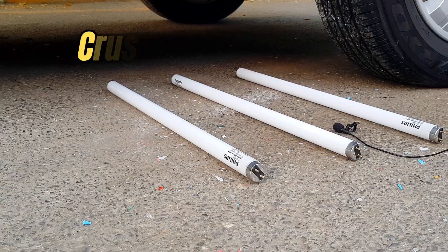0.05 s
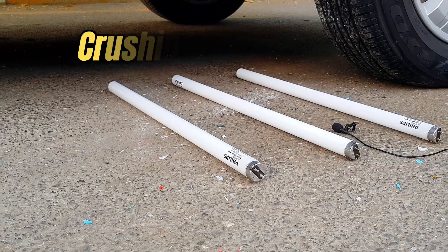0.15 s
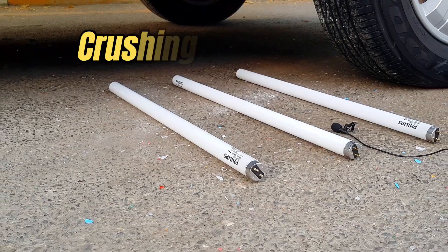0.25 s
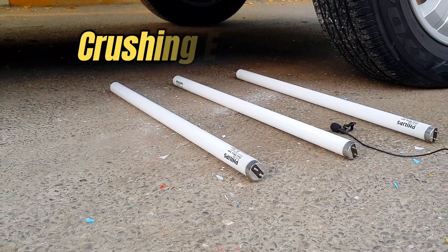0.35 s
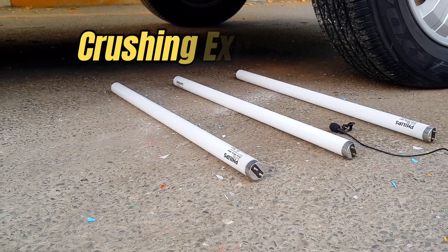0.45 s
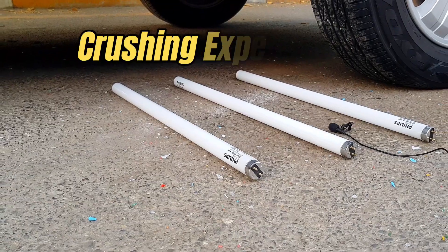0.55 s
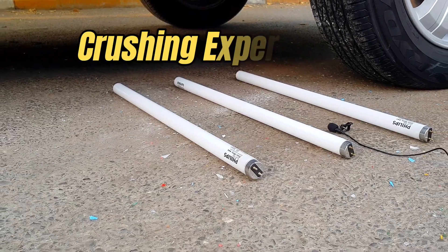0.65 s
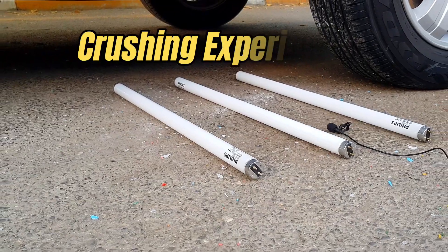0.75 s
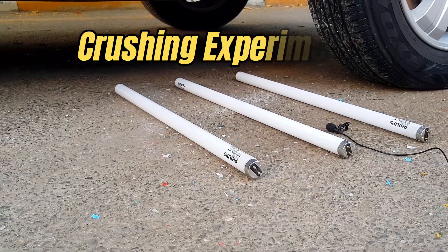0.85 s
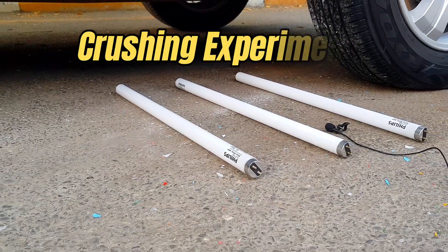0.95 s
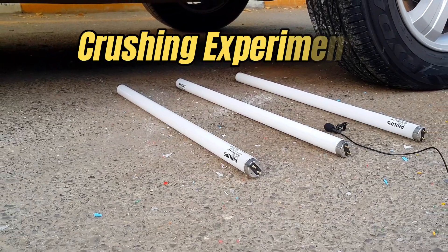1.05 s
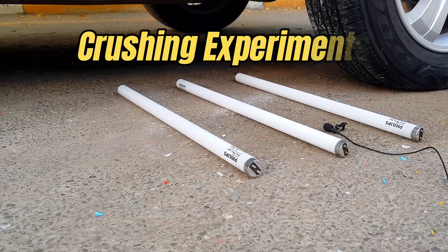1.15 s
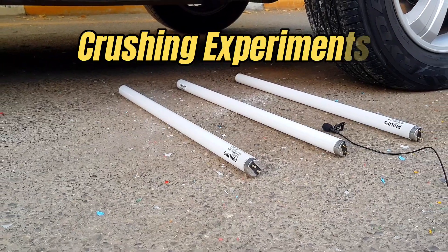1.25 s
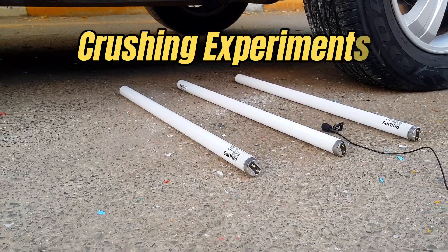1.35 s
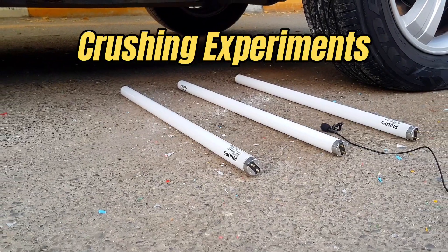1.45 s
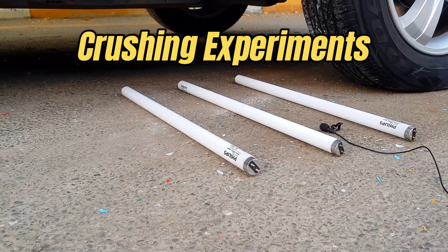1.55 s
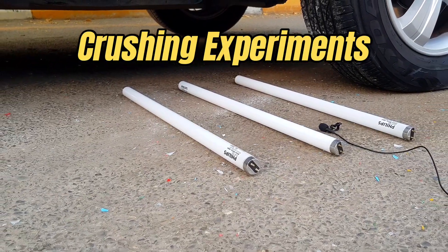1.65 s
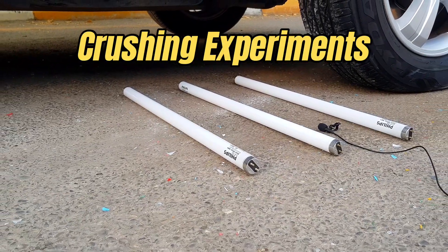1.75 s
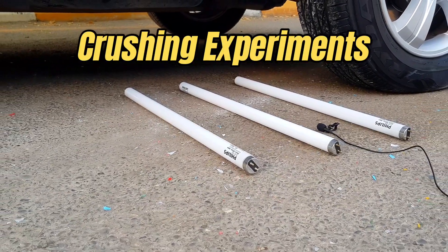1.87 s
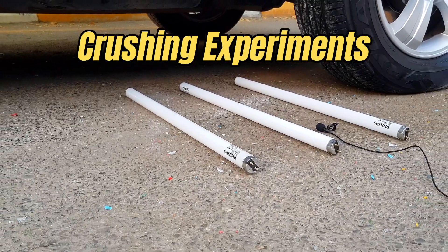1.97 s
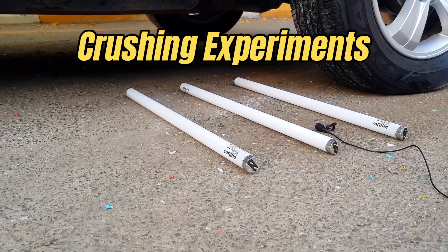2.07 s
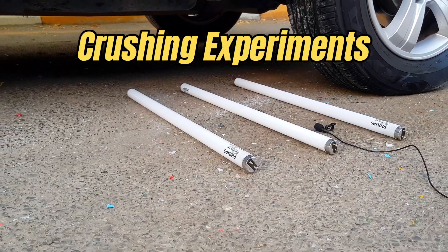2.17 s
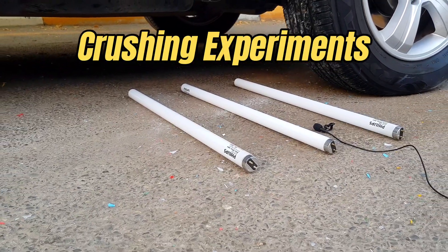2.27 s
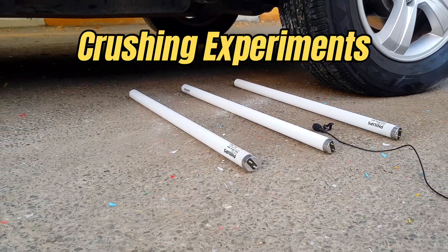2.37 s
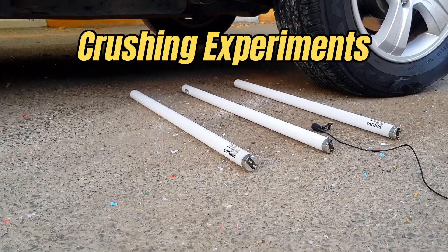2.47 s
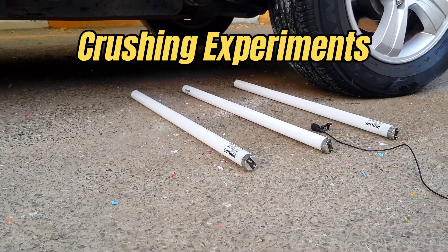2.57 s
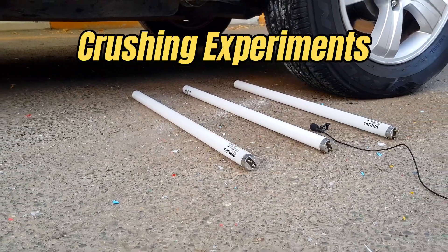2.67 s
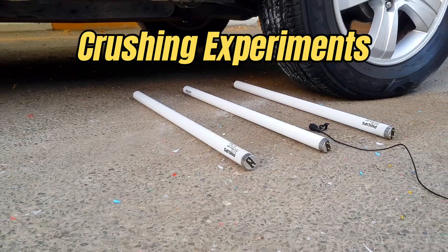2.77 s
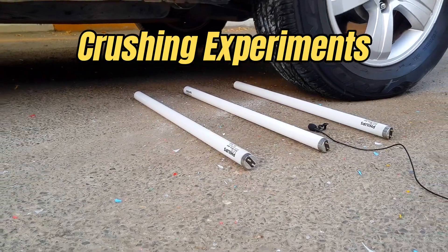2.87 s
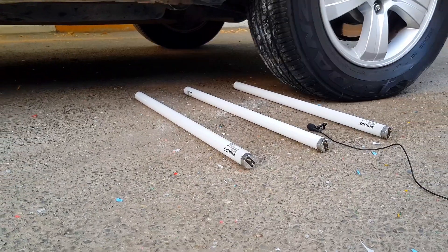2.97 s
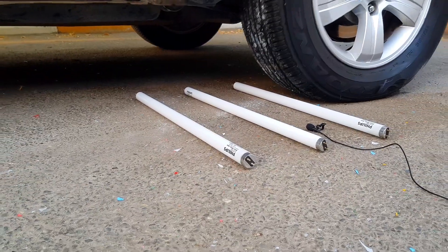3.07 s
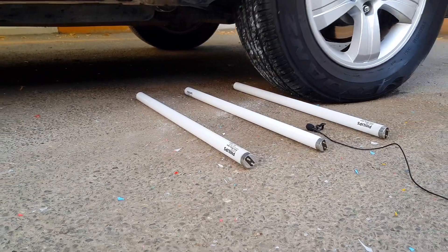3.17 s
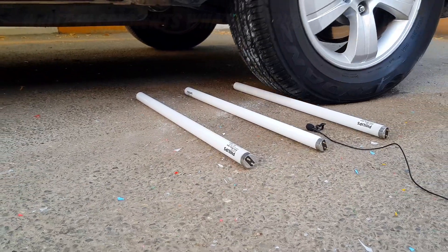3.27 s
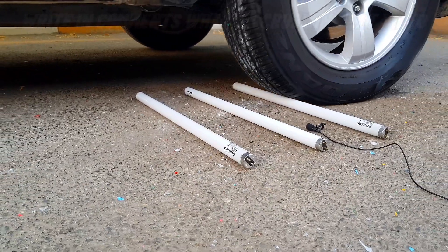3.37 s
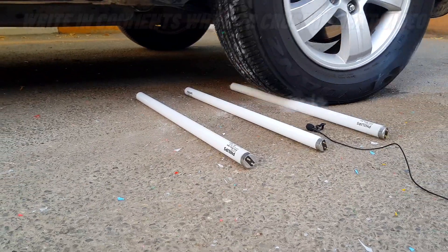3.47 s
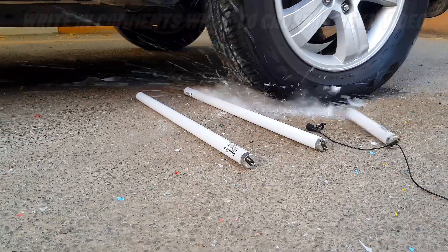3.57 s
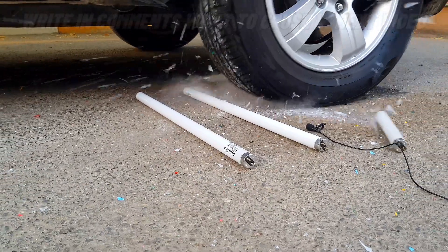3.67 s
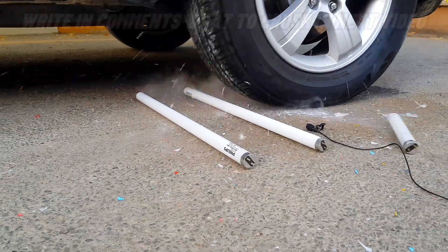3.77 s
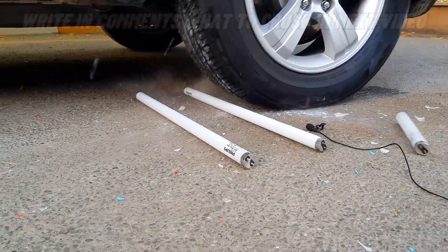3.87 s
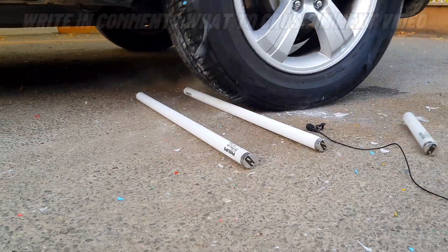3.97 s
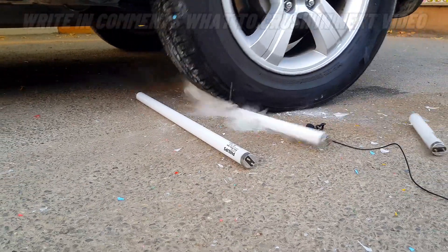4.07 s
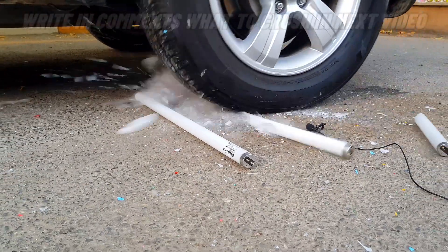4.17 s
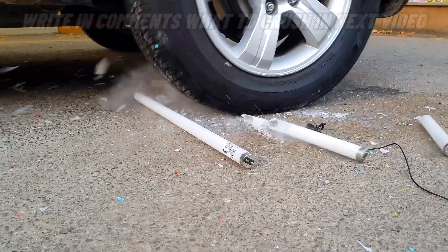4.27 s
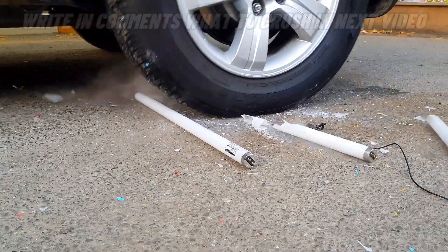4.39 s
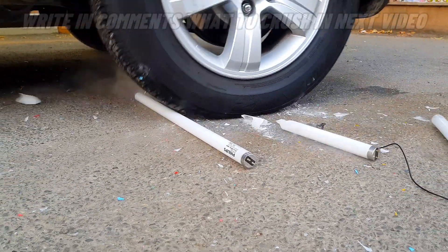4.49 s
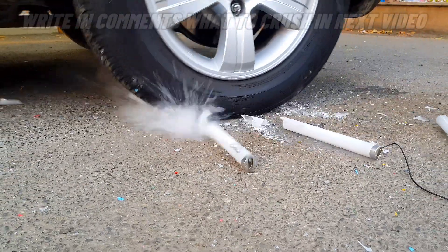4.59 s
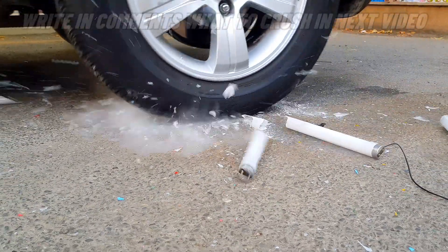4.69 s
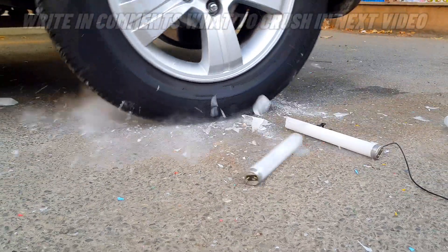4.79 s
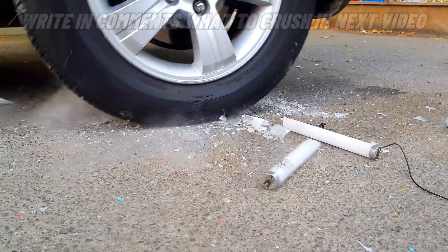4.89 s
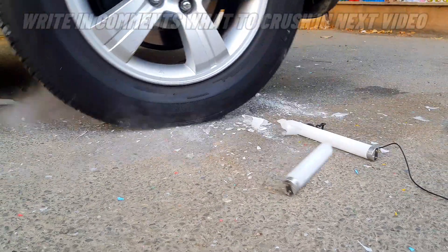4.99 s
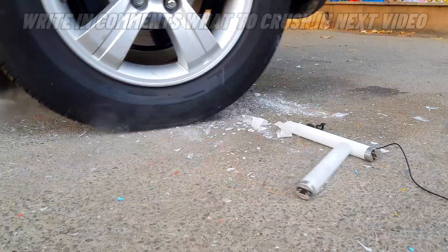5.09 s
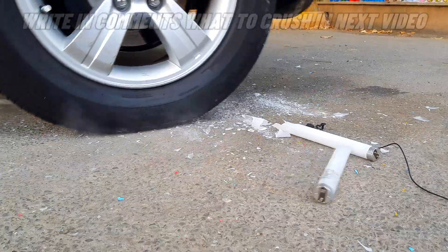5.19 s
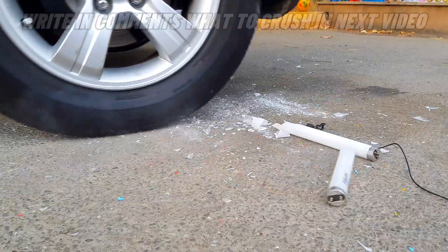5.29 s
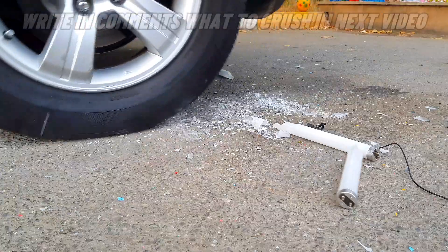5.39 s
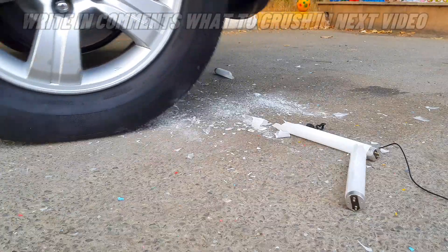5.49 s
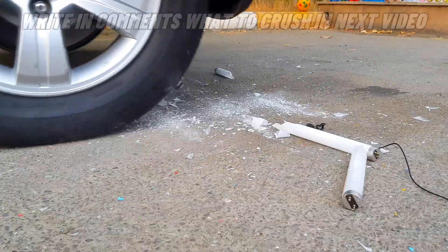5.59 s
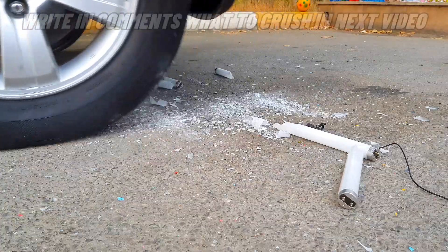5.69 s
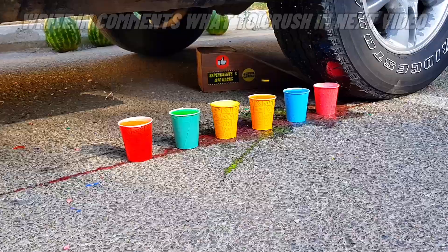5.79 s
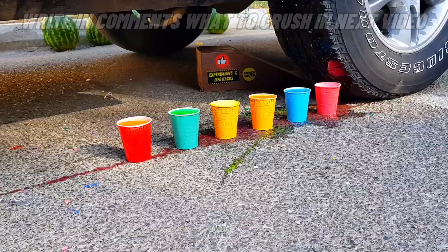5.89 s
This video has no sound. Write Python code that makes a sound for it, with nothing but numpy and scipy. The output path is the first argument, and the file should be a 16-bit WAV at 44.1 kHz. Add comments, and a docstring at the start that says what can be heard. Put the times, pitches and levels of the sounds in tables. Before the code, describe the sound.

Low pulsing car idle, a few gritty ticks, then three loud glass tube implosions on asphalt with bright clinking debris that fades away.

```python
"""Glass tubes crushed under an idling car

A car idles and creeps over three glass lamp tubes on asphalt, close to a small microphone. Idle: one filtered
pulse per firing, noise clatter and fuzzy whines; its level drops sharply as the glass starts. Tubes: cracks,
hollow pops and cavity booms of shaped noise, then showers of short ringing shards. Broken stubs bounce as noise
cracks with decaying sines; a soft noise wash cuts in abruptly near the end."""
import sys
import numpy as np
from scipy import signal
from scipy.fft import rfft, irfft
from scipy.io import wavfile
from scipy.ndimage import uniform_filter1d

SR = 44100
rng = np.random.default_rng(int(sys.argv[2]) if len(sys.argv) > 2 else 0)


def dump_mix(stems):
    """Bounce the given channels to the path in sys.argv[1] as a 16-bit WAV at rate SR."""
    frames = np.atleast_2d(stems).T  # one column per channel
    limited = np.clip(frames, -1, 1)  # hard clip at full scale
    pcm = np.round(limited * 32767).astype(np.int16)
    wavfile.write(sys.argv[1], SR, pcm)


N = 261845

# implosions: t/s, pop/dB, cavity f/Hz, cavity/dB, shattering/dB, shattering t60/s,
# falling shards/dB, their fade/(dB/s)
IMPLOSIONS = [(3.535, -3.5, 730, -10.5, -13, 0.37, -26.5, 25),
              (4.118, -6, 557, -10.5, -10.5, 0.28, -23.5, 61), (4.646, -2, 984, -7, -30, 1, -35.5, 17)]
# spectrum of breaking glass: f/Hz, relative density/dB
GLASS_SPECTRUM = [(710, -23), (1200, 20), (1610, 4.5), (2340, -4.5), (3290, -5.5), (5890, -7), (6150, 0),
                  (6860, 3.5), (13100, 4), (16000, -10), (16500, -41)]
# ringing cracks and bounces: t/s, level/dB, bass re middle/dB, treble re middle/dB,
# own ring f/Hz, own ring/dB, stub ring/dB
BOUNCES = [(3.425, -9.5, 9, 17, 7340, -9, -4), (3.428, -13, -24, -11, 8870, 4.5, -2),
           (3.43, -23, -11, -7, 4180, 4, -20), (3.44, -13.5, -4.5, -20, 2336, -1.5, -25),
           (3.442, -19.5, 0, -9, 1142, 0.5, -18), (3.463, -18, 11, 7, 10400, -17, -19),
           (3.469, -21.5, 16, 0, 1297, -5, -18), (3.486, -32.5, 12, -13, 2330, -3, 1),
           (3.551, -7, 25, 45, 1147, -12, -26), (3.554, -21, -4, 17, 4980, 1, -9),
           (3.567, -18, -1, 23, 5720, -0.5, -9), (3.592, -29, -5, 12, 3900, 1, -12),
           (3.589, -11, -39, 15, 6940, -20, 6.5), (3.61, -28.5, 3, -1, 2200, 0, -3),
           (3.614, -14.5, 9, 20, 12500, -0.5, 6.5), (3.695, -30.5, 22, 14, 3010, 0, -9),
           (3.73, -21.5, 14, 28, 12600, -2, -3), (3.765, -19.5, 1, 5, 6600, -18, -5),
           (3.824, -22, -2, 3, 3220, -7, -9), (3.863, -30, 8, -13, 3250, -1, -4),
           (4.095, -16.5, 0, 15, 9600, -29, -18), (4.209, -13, 2.5, 8, 2190, -9.5, -11),
           (4.232, -5.5, -2, 6, 8040, -22, -10), (4.242, -8.5, -8, 0.5, 8340, 2.5, -16),
           (4.316, -12.5, 0, 4.5, 3830, -4.5, -6), (4.376, -14.5, -2.5, 1, 1700, -32, -3),
           (4.416, -17, -4.5, -8, 3190, 1.5, -2.5), (4.449, -21, -3.5, -3, 3780, 2, -2.5),
           (4.541, -19, 9, 13, 886, -18, -5), (4.607, -16, 4, 8.5, 9000, -21, -23),
           (4.704, -7.5, 14, 40, 8380, -5.5, -2), (4.723, -11, -16.5, -7, 9400, 2, -3),
           (4.753, -18, 40, 42, 4620, -25, 1), (4.82, -25.5, 12, -22, 3070, -7, -3.5),
           (4.895, -40.5, -6, 27, 10000, 17, -10), (4.921, -23.5, 6.5, -2, 4820, -5, -3.5),
           (5.038, -37, 13, 14, 9850, -15, 10.5), (5.061, -14.5, -11, 4.5, 9280, -2, -3.5),
           (5.055, -27, -11, 9, 13700, 5, -12), (5.072, -23, -1, 1, 11660, 2, -0.5),
           (5.081, -31, -9, -10, 3800, -9, 3.5), (5.095, -17.5, -13, 12, 9020, -1, -20),
           (5.172, -18, 10.5, 9, 3900, -9, -20), (5.191, -27, -8, -1, 5670, -7, -1.5),
           (5.292, -35.5, 12, 3, 6200, -3, 4)]
# closing wash: t/s, level/dB
WASH_LEVEL = [(5.74, -74), (5.78, -40), (5.85, -38), (5.94, -40)]


def amp(db):
    """Amplitude factor of a level in dB."""
    return 10 ** (np.asarray(db) / 20)


def evened(x):
    """Scale to rms 1."""
    return x / np.sqrt(np.mean(x ** 2) + 1e-20)


def read(points, hz):
    """Value of a spectrum table on a log-frequency axis."""
    f, value = np.transpose(points)
    return np.interp(np.log(hz + 1), np.log(f + 1), value)


def curve(rows):
    """Columns of a time table at every sample."""
    s, *columns = np.transpose(rows)
    return [np.interp(np.arange(N) / SR, s, c) for c in columns]


def add(mix, s, sound):
    """Add a sound into the mix at s seconds, cut at the end."""
    part = mix[round(s * SR):][:len(sound)]
    part += sound[:len(part)]


def coloured(points, size):
    """Noise of rms 1 with the given spectrum."""
    gain = amp(read(points, np.fft.rfftfreq(size, 1 / SR)))
    return evened(irfft(rfft(rng.standard_normal(size)) * gain, size))


def causal(points, size=16384):
    """Minimum-phase impulse response of a spectrum, floored at -100 dB."""
    hz = abs(np.fft.fftfreq(size, 1 / SR))
    log_gain = np.log(amp(np.maximum(read(points, hz), -100)))
    return np.fft.ifft(np.exp(np.conj(signal.hilbert(log_gain)))).real[:size // 2]


def fuzzy(hz, width_hz):
    """Narrow noise of rms 1 on a fixed or drifting centre: two equal poles, shifted up."""
    r = np.exp(-np.pi * width_hz / SR)
    noise = rng.standard_normal(N) + 1j * rng.standard_normal(N)
    slow = signal.lfilter([1], np.poly([r, r]), noise)
    carrier = np.exp(2j * np.pi * np.cumsum(hz * np.ones(N)) / SR)
    return evened((slow * carrier).real)


def rings(modes, t, spread_db):
    """Decaying sines, each struck up to spread_db weaker and at a random phase."""
    hz, db, t60_s = np.transpose(modes)[:, :, None]
    luck = rng.random((len(modes), 2, 1))
    envelope = amp(db - spread_db * luck[:, 0] - 60 * t / t60_s)
    return (envelope * np.sin(2 * np.pi * (hz * t + luck[:, 1]))).sum(0)


def wash():
    """Soft broad noise that cuts in abruptly near the end."""
    # f/Hz, relative density/dB
    wash_spectrum = [(15, -46), (25, -8), (69, -3), (213, -15.5), (257, -15.5), (501, -20), (588, -25),
                     (673, -20), (749, -25), (1460, -27), (1580, -34), (2500, -24.5), (15000, -50)]
    return amp(curve(WASH_LEVEL)[0]) * coloured(wash_spectrum, N)


def hum():
    """Low narrow-band hum under the glass."""
    # t/s, level/dB
    hum_level = [(3.55, -84), (3.65, -55.5), (4.6, -56.5), (5.1, -47), (5.5, -81), (5.75, -88)]
    return amp(curve(hum_level)[0]) * fuzzy(218.5, 10.0)


def whistle():
    """Fuzzy high whistle of the engine bay: drifting narrow noise that swells and fades."""
    # t/s, centre f/Hz, level/dB
    whistle_track = [(1.7, 8600, -59), (2.15, 8550, -55), (2.4, 8500, -44.5), (2.7, 8300, -55),
                     (2.9, 8200, -52), (3.05, 8300, -63), (3.35, 8300, -42)]
    hz, db = curve(whistle_track)
    t = np.arange(N) / SR
    start_s, end_s = whistle_track[0][0], whistle_track[-1][0] + 0.13
    gate = np.clip(np.minimum(t - start_s, end_s - t) / 0.4, 0, 1)
    return gate * amp(db) * fuzzy(hz, 360.0)


def engine():
    """One puff a firing: the pipe booms, a sharp drop ends its first crest, clatter pulses in step."""
    # engine speed: t/s, firing rate/Hz
    firing_rate = [(0, 23.28), (1.3, 23.31), (1.6, 23.39), (3.3, 23.37), (4.6, 23.2), (4.9, 23.5),
                   (5.75, 23.5)]
    # idle: t/s, puff level/dB
    idle_level = [(0, -27.5), (1.6, -27), (3.4, -28), (3.7, -47.5), (4.9, -43.5), (5.74, -47), (5.8, -54)]
    # exhaust spectrum: multiple of 23.4 Hz, relative level/dB
    exhaust_orders = [(1, -103), (2, -0.5), (3, 2), (4, 3.5), (5, -17.5), (6, -12.5), (7, -7.5), (8, -9),
                      (9, -14.5), (10, -19.5), (11, -14.5), (12, -16), (13, -15.5), (14, -16), (15, -16.5),
                      (16, -31.5)]
    # engine bay noise: f/Hz, relative density/dB
    clatter_spectrum = [(59, -9.5), (100, -3), (124, -15.5), (174, -13), (335, -17.5), (415, -18.5),
                        (1030, -21), (1360, -28.5), (1870, -28.5), (3860, -33), (4290, -36), (6700, -36),
                        (8640, -29.5), (13500, -48.5), (16000, -55)]
    # fuzzy engine bay tones: f/Hz, width/Hz, level re puffs/dB
    fuzzy_tones = [(1508, 21, -34), (4200, 40., -35.5), (7400, 340, -34.5), (8800, 290, -32),
                   (11380, 950, -30), (13270, 790, -30)]
    # thin engine bay tone: f/Hz, level re puffs/dB
    thin_tone = (4398, -32)

    rate_hz = curve(firing_rate)[0]
    lead_in = np.full(SR // 10, rate_hz[0])  # already running at the start
    turns = np.cumsum(np.r_[lead_in, rate_hz]) / SR + .13
    fired = np.diff(np.floor(turns), prepend=0)
    fired = fired * amp(.9 * rng.standard_normal(len(turns)))

    orders = [(k * 23.4, db) for k, db in exhaust_orders]
    boom = causal([(10, -63)] + orders[:5] + [(170, -44.5), (400, -96.0)])
    edge = causal([(60, -65.0), (110, -10.5)] + orders[5:] + [(600, -25.5), (1500, -91.5)])
    late = round(0.01215 * SR)
    pulse = boom - np.r_[np.zeros(late), edge[:-late]]
    puffs = evened(signal.oaconvolve(fired, pulse)[len(turns) - N:len(turns)])

    clatter = coloured(clatter_spectrum, N) * (1 + 0.048 * np.cos(2 * np.pi * turns[-N:] - 1.5))
    whines = sum(amp(db) * fuzzy(hz, width_hz) for hz, width_hz, db in fuzzy_tones)
    thin_hz, thin_db = thin_tone
    phase_wander = 4.4 * fuzzy(2., 2.7)
    whines += amp(thin_db) * np.sin(2 * np.pi * thin_hz * np.arange(N) / SR + phase_wander)
    rumble = amp(-18) * fuzzy(70., 25.)
    return amp(curve(idle_level)[0]) * (puffs + amp(-7.5) * clatter + rumble + whines)


def thud(db, hz, t60_s):
    """Soft low push of tyre and tube on the ground: a decaying sine."""
    t = np.arange(SR // 3) / SR
    return amp(db - 60 * t / t60_s) * np.sin(2 * np.pi * hz * t)


def tint(low_db, high_db):
    """Spectrum of one crack, from its bass and treble against the middle."""
    return [(250, low_db - 8.0), (1200, low_db), (4200, 0), (10000, high_db), (16000, high_db - 15.0)]


def crack(level_db, colour, t60_s, t):
    """A spike, then a short crackle, both of one coloured noise."""
    envelope = amp(-60 * t / t60_s) + 0.34 * np.exp(-t / 0.00018)
    return amp(level_db) * coloured(colour, len(t)) * envelope


def tick(level_db, low_db, high_db):
    """Grit or a bare splinter: the crack alone."""
    return crack(level_db, tint(low_db, high_db), .006, np.arange(SR // 10) / SR)


def clink(s, level_db, low_db, high_db, hz, own_db, stub_db):
    """A crack, the shard's own ring, and the ring of the stub that bounces just then."""
    # ringing stubs: f/Hz, level/dB, t60/s
    first_stub = [(1150, -6, .06), (2180, -10, .12), (2340, -3, .14), (3060, -8, .08), (3800, -9, .07),
                  (4250, -5, .05), (4900, -10, .12), (5800, -8, .08), (6500, -11, .3), (7080, -4, .1),
                  (8900, -5, .05), (9330, -3, .1), (10920, -6, .08), (12600, -7, .05)]
    second_stub = [(870, -13, .4), (1595, 0, .2), (1869, -6, .3), (2390, -5, .25), (2955, -7, .15),
                   (3197, -5, .1), (3800, -4, .1), (4622, -4, .25), (5281, -9, .15), (6293, -7, .15),
                   (8300, -3, .09), (8880, -8, .1), (9400, -1, .11), (10530, -8, .08), (11960, -8, .08)]
    third_stub = [(1880, -9, .2), (2412, -8, .1), (3860, -9, .11), (4791, -6, .22), (5642, -9, .22),
                  (6584, -7, .16), (7230, -2, .3), (9426, -2, .16), (9860, -4, .15), (11360, -2, .13),
                  (13400, -6, .1), (13880, -5, .08)]
    # start of the second and third stub's bounces: t/s
    takeover_s = (4.11, 4.85)

    t, colour = np.arange(SR // 3) / SR, tint(low_db, high_db)
    stub = np.array((first_stub, second_stub, third_stub)[np.searchsorted(takeover_s, s)], float)
    # the crack's colour also tilts the stub modes
    stub[:, 1] += stub_db + 1.39 * (read(colour, stub[:, 0]) - max(db for _, db in colour))
    own_t60_s = .085 * (5000 / hz) ** .15  # lower shards ring longer
    ring = rings([(hz, own_db, own_t60_s)], t, 0) + rings(stub, t, 3.7)
    return crack(level_db, colour, .02, t) + amp(level_db) * ring * (1 - np.exp(-t / 0.00069))


def shards(rate_hz, spread_db, tick_db, longest_t60_s, count=70):
    """Many small shards, each kind a tick with three short rings; a few land hard. Levelled locally."""
    landed = rng.random(len(rate_hz)) < rate_hz / SR
    size = amp(spread_db * np.minimum(rng.exponential(1, len(rate_hz)), 4)) * landed
    kind = rng.integers(0, count, len(rate_hz))
    t, out = np.arange(3000) / SR, np.zeros(len(rate_hz))
    for k in range(count):
        hz = np.exp(rng.uniform(np.log(2100), np.log(15500), 3))
        mode_db = read(GLASS_SPECTRUM, hz) + 0.6 * np.log2(hz / 4000)
        modes = np.transpose([hz, mode_db, longest_t60_s * rng.uniform(0.1, 1, 3)])
        contact = coloured([(hz[0] / 17.0, -18), (hz[0], 0), (hz[0] * 2.0, -15)], len(t))
        contact = amp(tick_db - 60 * t / 0.0011) * contact
        out += signal.oaconvolve(size * (kind == k), contact + rings(modes, t, 9.))[:len(rate_hz)]
    return out / np.sqrt(uniform_filter1d(out ** 2, 6001) + 1e-9)


def shower():
    """Shards land after a flight, then ever fewer and fainter, over the fine hiss of glass dust."""
    t, power, rate_hz = np.arange(N) / SR, np.zeros(N), np.zeros(N)
    # t/s, level/dB, fade/(dB/s), flight/s, landings/(1/s)
    throws = [(row[0], *row[-2:], .12, 600) for row in IMPLOSIONS]
    # every bounce sheds a few splinters of its own
    throws += [(row[0], row[1] - 28.5, 151, .02, 200) for row in BOUNCES]
    for s, db, fade_db_per_s, flight_s, per_s in throws:
        arrived = np.clip((t - s) / flight_s, 0, 1) ** 2
        lost_db = fade_db_per_s * np.maximum(t - s - flight_s, 0)
        power += (arrived * amp(db - lost_db)) ** 2
        rate_hz += per_s * arrived * amp(-.8 * lost_db)

    # after each burst the ringing shards give way to dull grit, at 23 dB/s
    starts_s = np.array([0] + [row[0] for row in IMPLOSIONS])
    since_s = t - starts_s[np.searchsorted(starts_s, t, "right") - 1]
    ringing = amp(-23 * since_s)
    falling = shards(rate_hz + 100, 5., 0., .11) + amp(-17) * coloured(GLASS_SPECTRUM, N)
    grit = signal.lfilter(*signal.butter(2, 7000, fs=SR), shards(rate_hz + 200, 4.5, 9., .02))
    mixed = ringing * falling + np.sqrt(1 - ringing ** 2) * grit
    return mixed * np.sqrt(power) * (t < WASH_LEVEL[1][0])  # stops as the wash cuts in


def burst(pop_db, cavity_hz, cavity_db, shatter_db, shatter_t60_s):
    """Air slams into the emptied tube: a pop, a hollow boom, a crack and a spray of shards."""
    # f/Hz, relative density/dB
    pop_spectrum = [(35, -38), (60, -20), (205, -7.5), (330, -7), (702, -11), (837, -13), (1110, -11.5),
                    (1690, -14.5), (1980, -13), (2280, -16.5), (4000, -9.5), (5200, -63), (8800, -120)]
    # f/Hz, t60/s
    pop_decay = [(100, 0.33), (300, 0.083), (800, 0.2), (2000, 0.12), (4000, 0.015)]

    t = np.arange(SR // 2) / SR
    # pop decays at its own rate in each band, fastest in the high treble
    hz, frame_s, z = signal.stft(coloured(pop_spectrum, len(t)), SR, nperseg=256, noverlap=192)
    z = z * amp(-60 * frame_s / read(pop_decay, hz)[:, None])
    pop = signal.istft(z, SR, nperseg=256, noverlap=192)[1][:len(t)]

    cavity = [(cavity_hz / 1.65, -30), (cavity_hz, 0), (cavity_hz * 1.2, -22), (cavity_hz * 16.0, -50)]
    boom = coloured(cavity, len(t)) * amp(-60 * t / 0.14) * (1 - np.exp(-t / 0.0021))
    snap = amp(8.5 - 60 * t / 0.011) * coloured(GLASS_SPECTRUM, len(t))
    # the shards take a moment to fly and collide
    spray = shards(np.full(len(t), 3500.), 2.2, 1.9, 0.054)
    spray = spray * amp(-60 * t / shatter_t60_s) * (1 - np.exp(-t / 0.0018))
    total = amp(pop_db) * pop + amp(cavity_db) * boom + snap + amp(shatter_db) * spray
    return (1 - np.exp(-t / 0.0017)) * total


def underside_echo(glass):
    """The car's underside throws the glass back briefly: a decaying noise response after 2 ms."""
    t = np.arange(4000) / SR
    echo = rng.standard_normal(len(t)) * amp(-60 * t / 0.11) * (t > .002)
    return amp(-10.0) * signal.oaconvolve(glass, echo / np.linalg.norm(echo))[:N]


def scene():
    """Engine and wash around the glass events and their echo."""
    # t/s, level/dB, f/Hz, t60/s
    thud_rows = [(3.538, -20, 112, 0.21), (3.619, -31, 70, 0.15), (4.122, -29, 80, 0.14),
                 (4.652, -39, 87, 0.23), (4.723, -9, 71.5, 0.05)]
    # grit and splinters: t/s, level/dB, bass re middle/dB, treble re middle/dB
    tick_rows = [(2.43, -28, 4, 10), (2.589, -24.5, 21, 19), (2.639, -20.5, 7.5, 4.5), (2.949, -25, 8, -11),
                 (3.404, -11, 13, 12.5), (3.676, -14, 42, 23), (3.745, -21, 2, 5), (3.787, -16, -10, 13),
                 (3.847, -19, 7, -3), (3.894, -27, 7, 1), (3.929, -15, 5.5, 11), (3.962, -15.5, -1.5, 9),
                 (4.004, -21, -24, 6), (4.044, -22, -5, -23), (4.078, -25, 20, 6), (4.157, -17, 19, 25),
                 (4.362, -10.5, 5, -47), (4.398, -23, -3, 10), (4.431, -17, 6, 13), (4.478, -12.5, -2, 6),
                 (4.53, -18.5, 6, 7), (4.788, -16.5, 9, -12), (4.796, -12.5, 26, 17),
                 (4.849, -17.5, 10, -3), (4.877, -27, 6, -7), (4.991, -19, 4, -10), (5.007, -23, 17, -12),
                 (5.158, -22.5, 5, -7), (5.168, -16.5, 23, -14), (5.236, -26, 30, -3), (5.264, -23, 2, -1),
                 (5.313, -23.5, 20, 8), (5.324, -22.5, 16, 20), (5.423, -32.5, 4, -9), (5.451, -29, 3, -2),
                 (5.484, -31.5, 8, 2), (5.579, -31.5, 10, -5), (5.657, -42, 20, -9), (5.69, -42, 16, -13),
                 (5.771, -33.5, -1, -7)]

    glass = shower()
    for s, *row in IMPLOSIONS:
        add(glass, s, burst(*row[:5]))
    for s, *row in thud_rows:
        add(glass, s, thud(*row))
    for s, *row in tick_rows:
        add(glass, s + 0.001064, tick(*row))
    for row in BOUNCES:
        add(glass, row[0] + 0.0011, clink(*row))
    glass = glass + underside_echo(glass)
    return (wash() + hum() + whistle() + engine() + glass)[None]


def record(dry):
    """Soft overload on the pops, then a 16.4 kHz band limit."""
    loud = np.tanh(dry / 0.98) * 1.047
    lowpass = signal.firwin(511, 16400, window=("kaiser", 9), fs=SR)
    return signal.oaconvolve(loud, lowpass[None], "same")


dry = scene()
out = record(dry)
dump_mix(out)
```